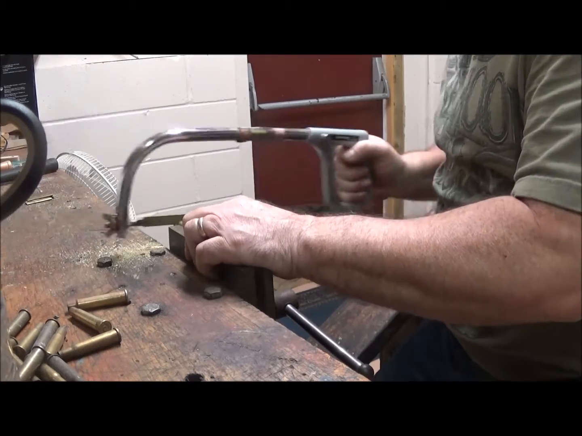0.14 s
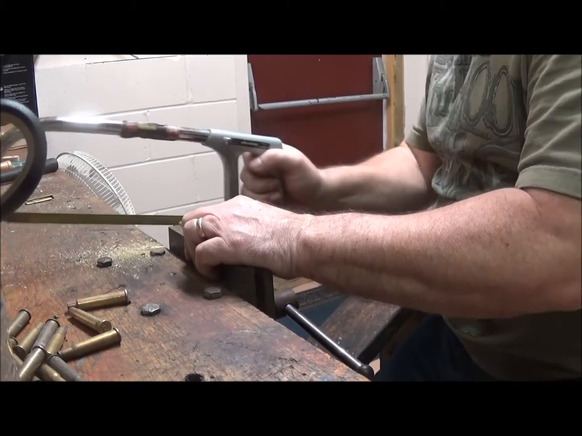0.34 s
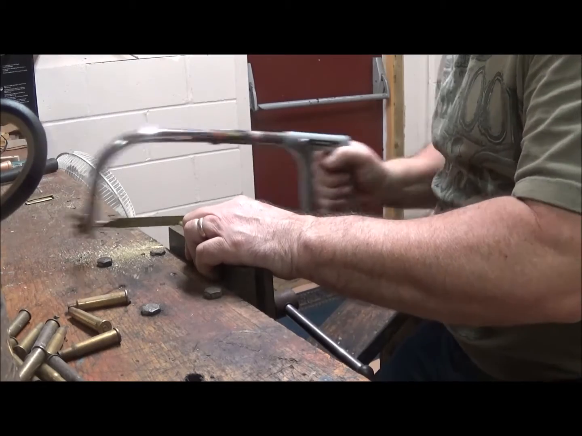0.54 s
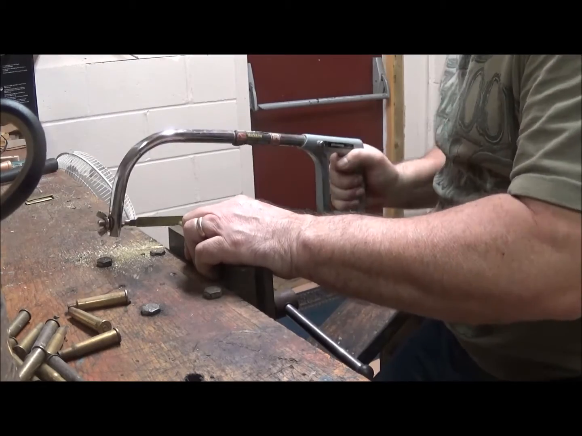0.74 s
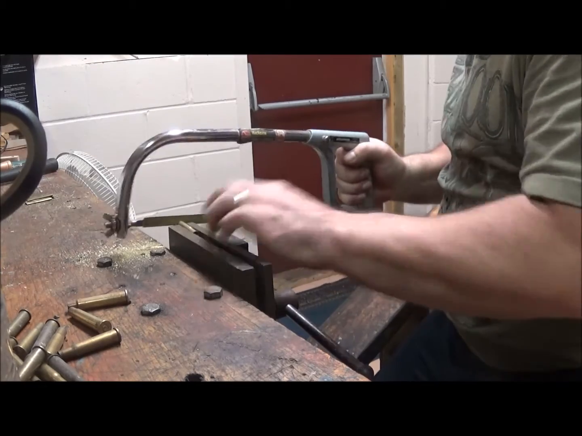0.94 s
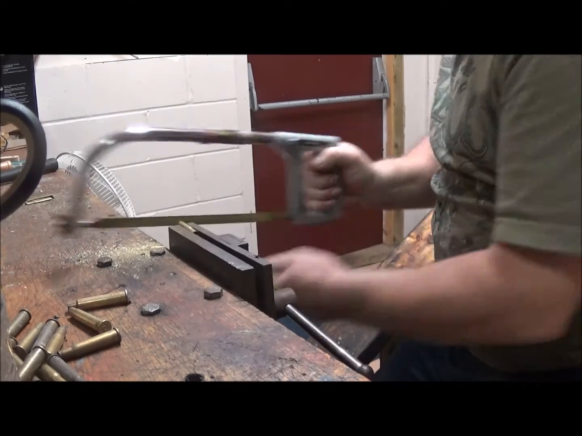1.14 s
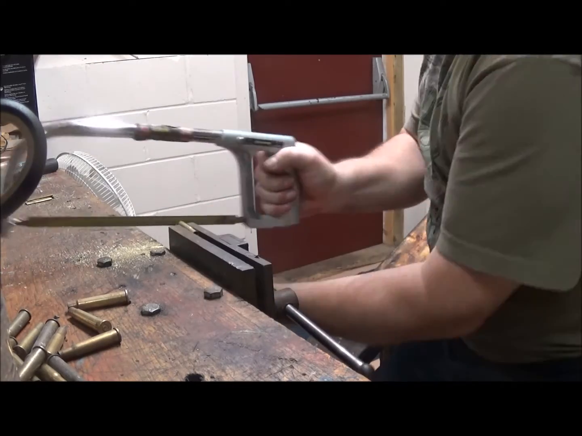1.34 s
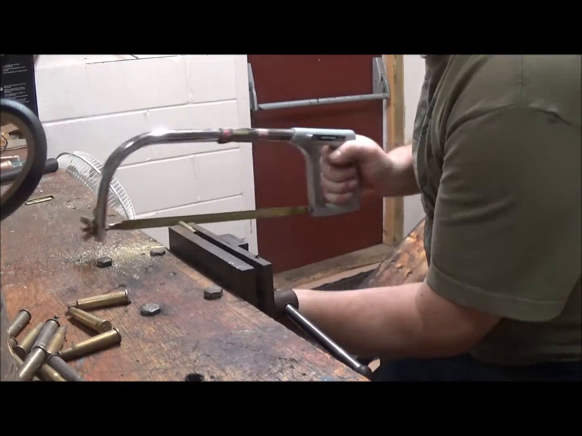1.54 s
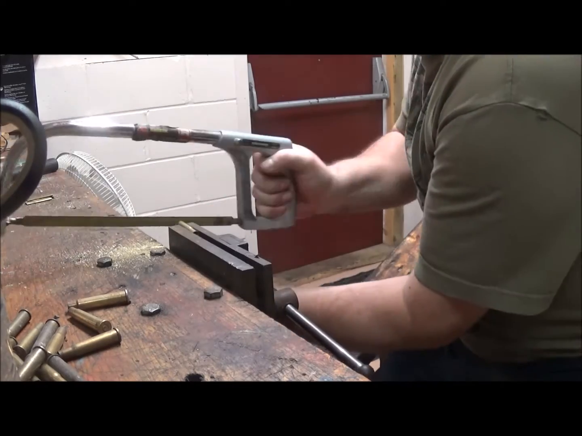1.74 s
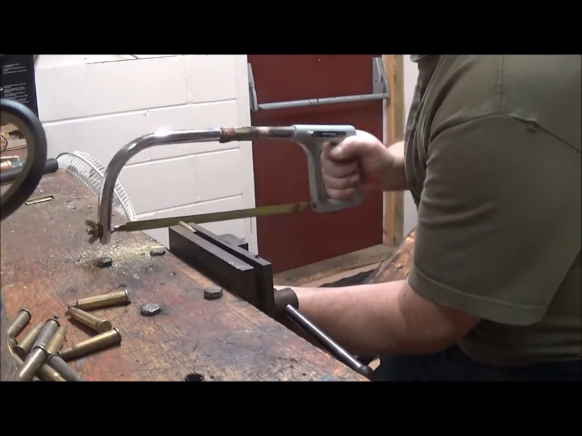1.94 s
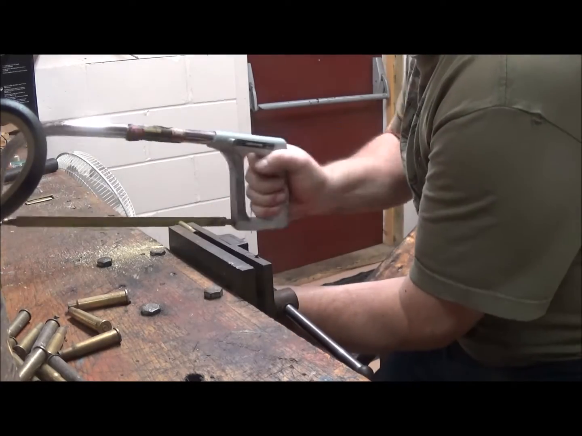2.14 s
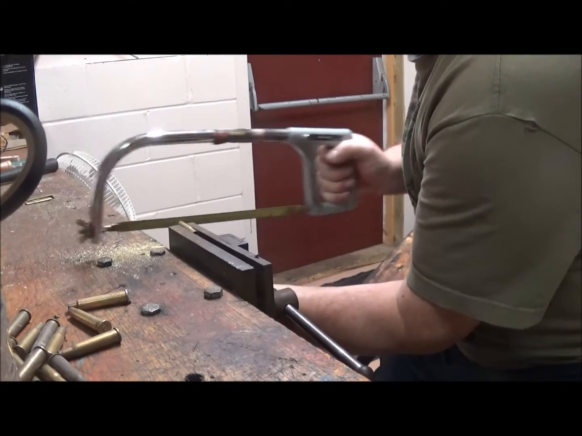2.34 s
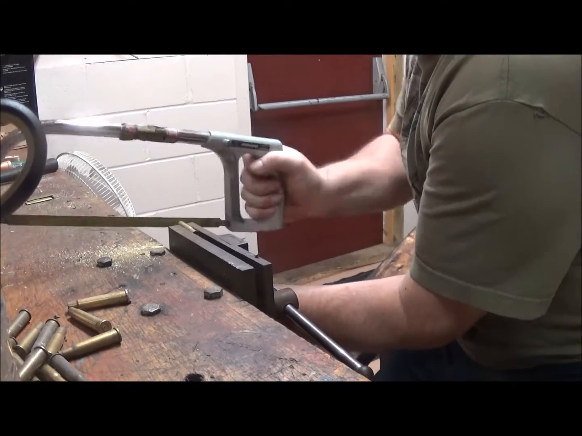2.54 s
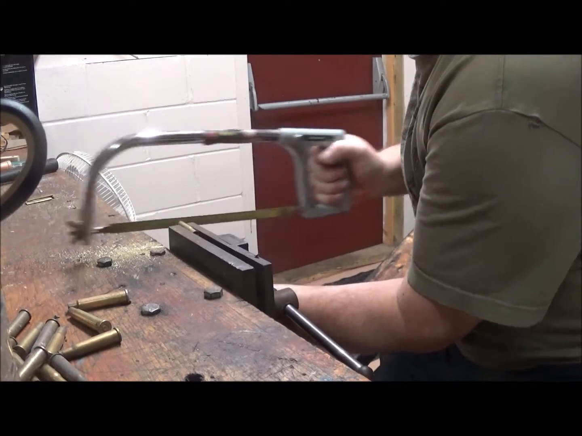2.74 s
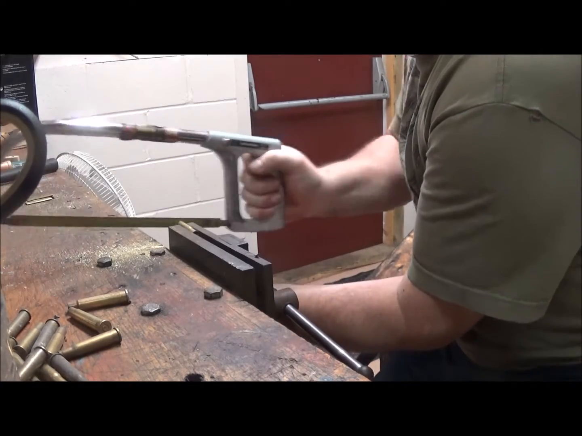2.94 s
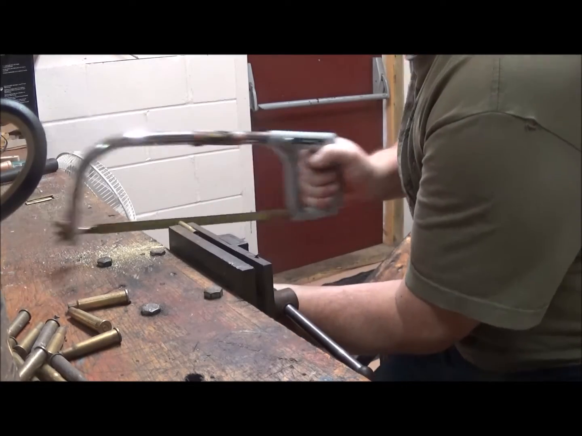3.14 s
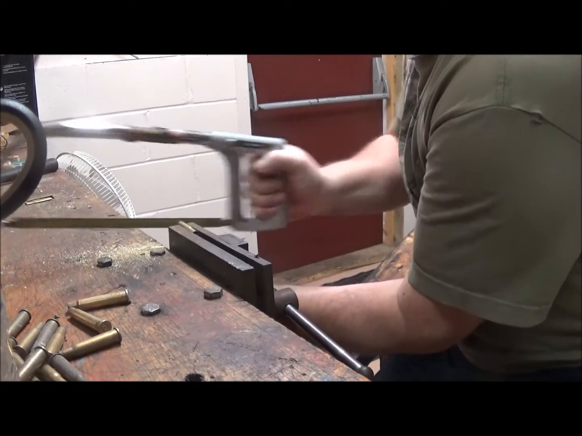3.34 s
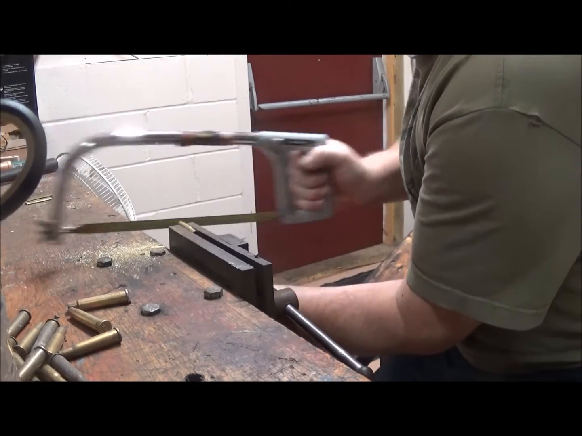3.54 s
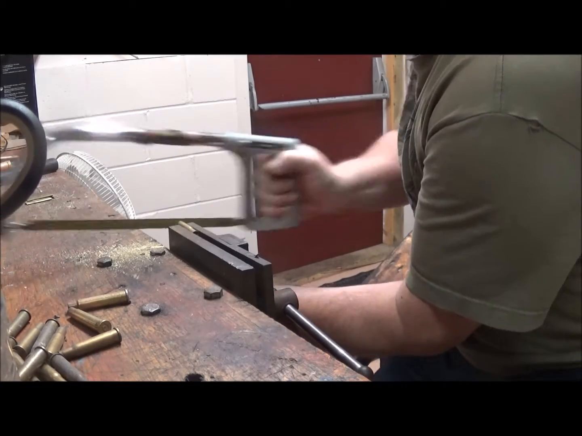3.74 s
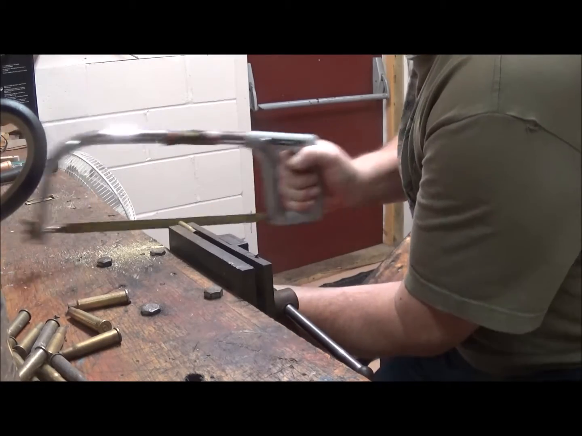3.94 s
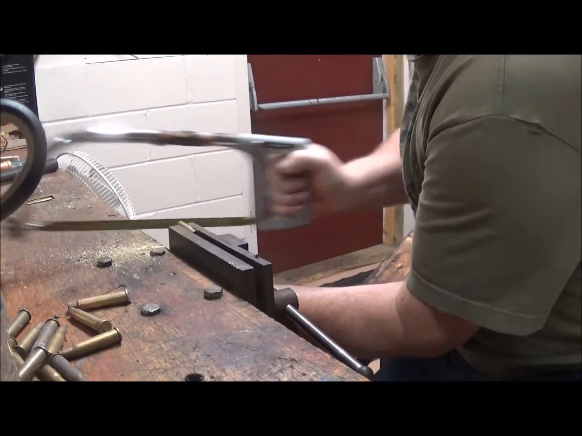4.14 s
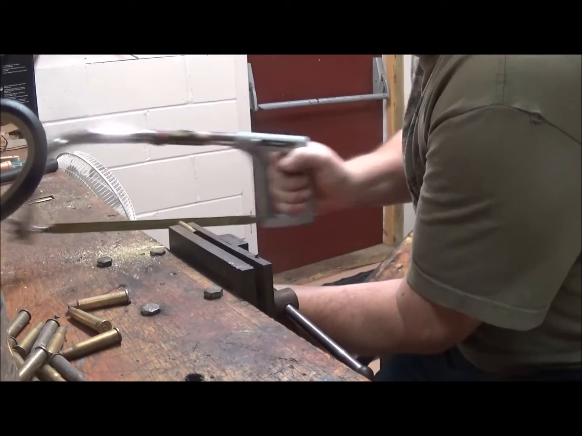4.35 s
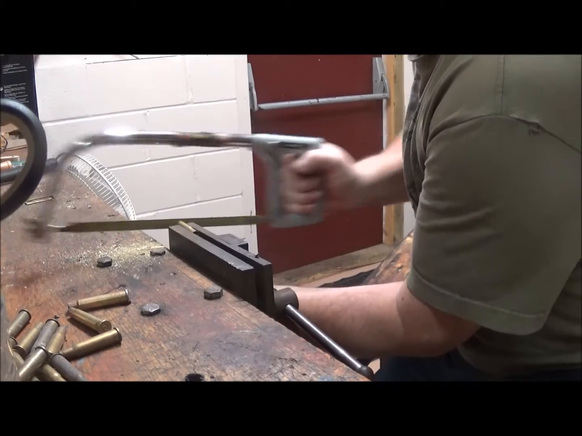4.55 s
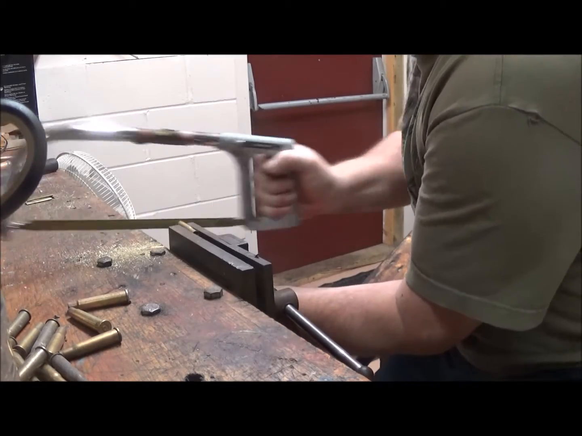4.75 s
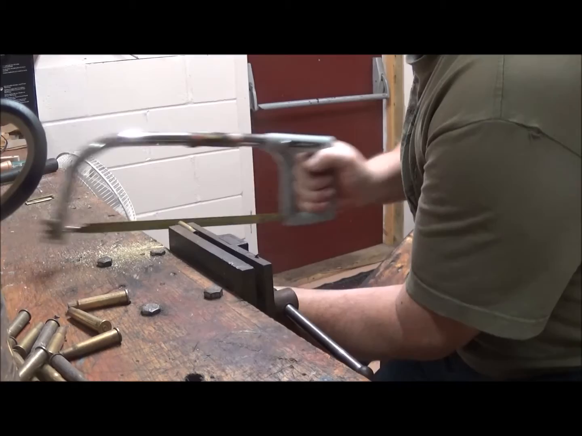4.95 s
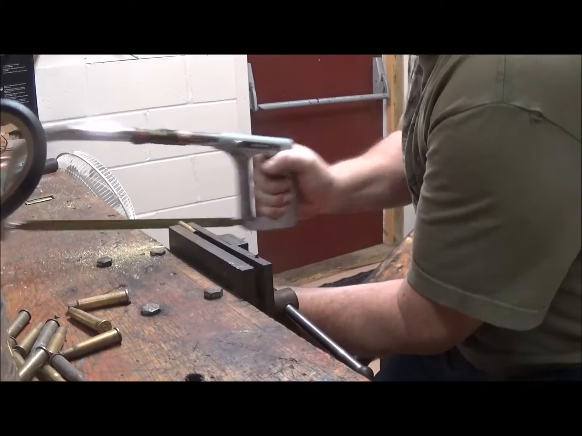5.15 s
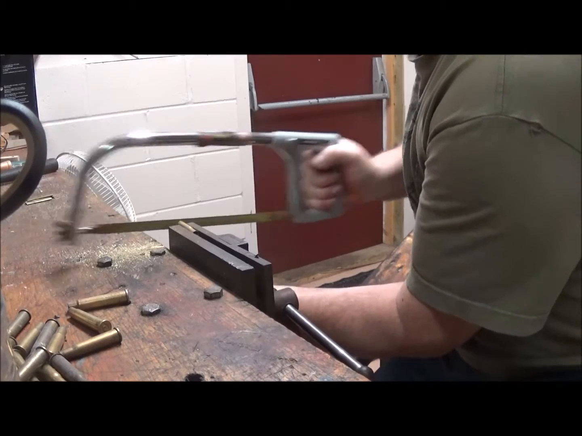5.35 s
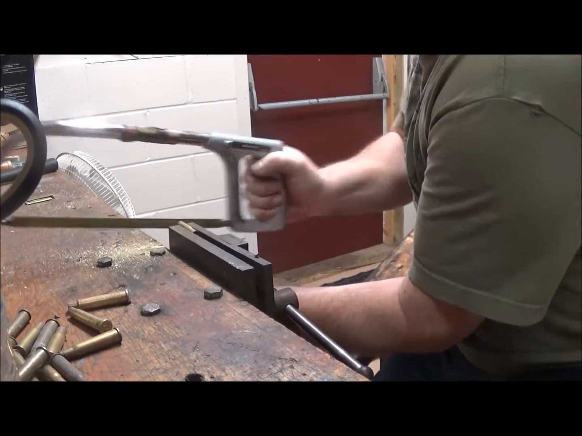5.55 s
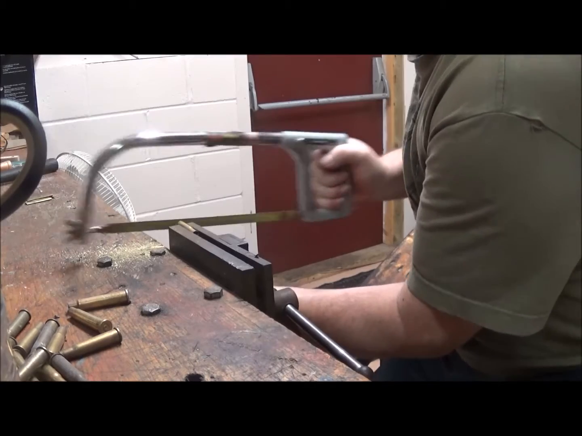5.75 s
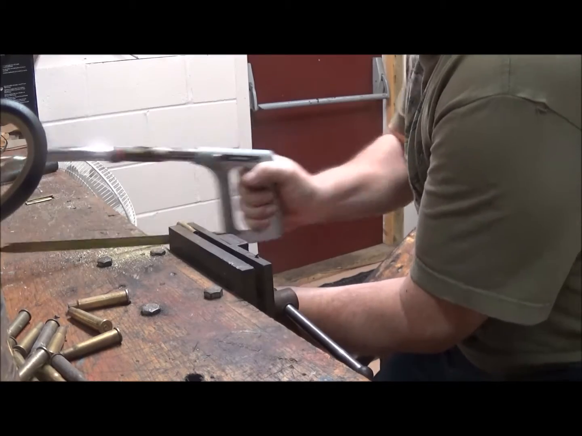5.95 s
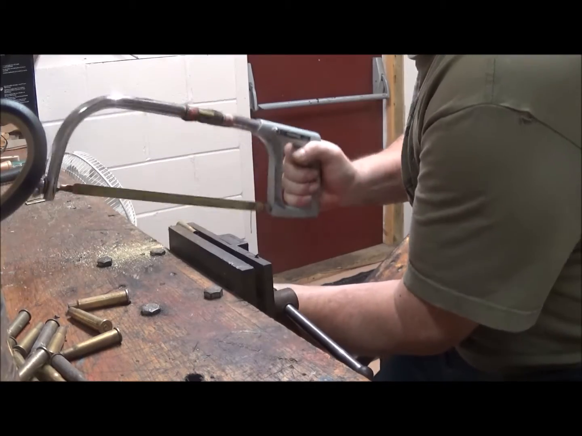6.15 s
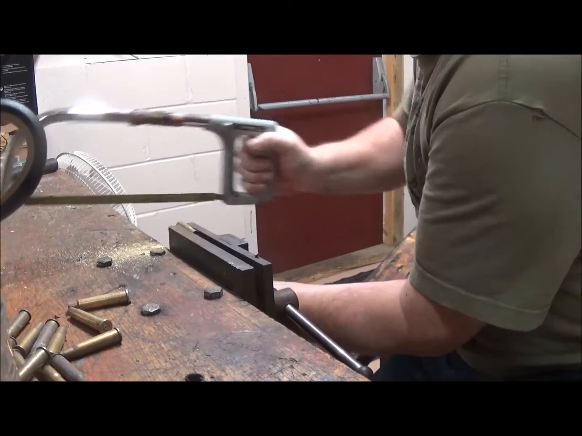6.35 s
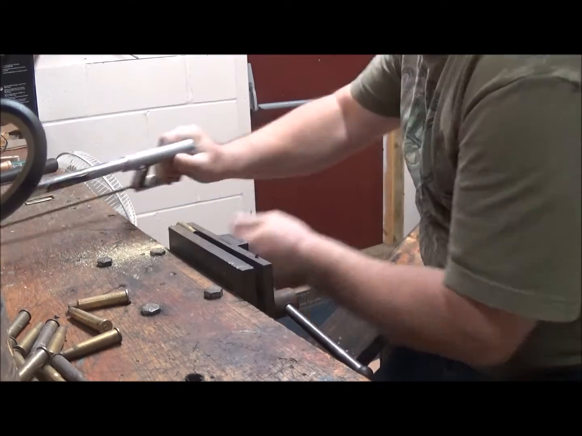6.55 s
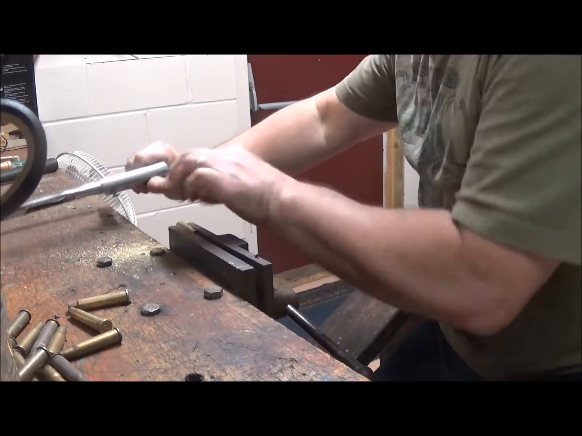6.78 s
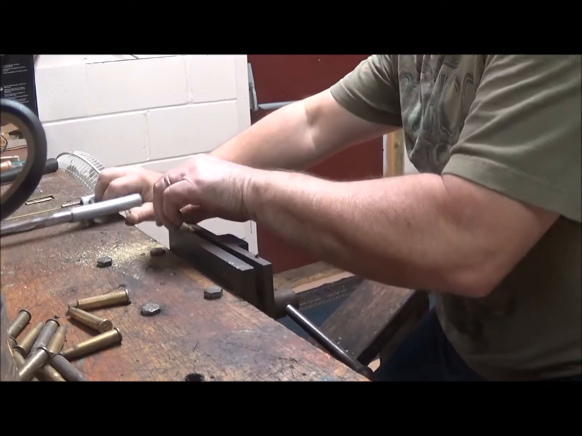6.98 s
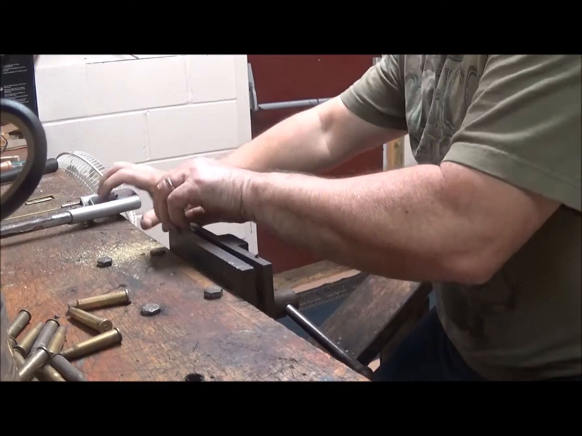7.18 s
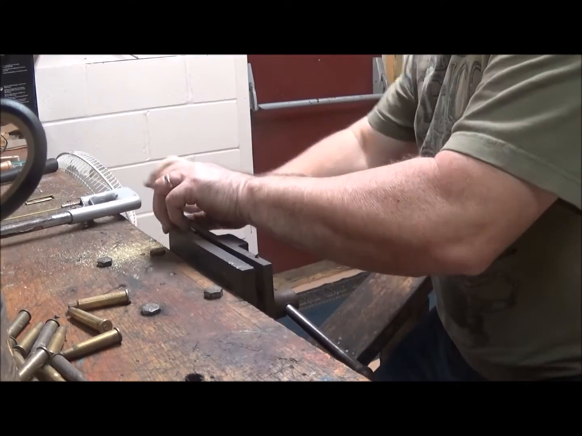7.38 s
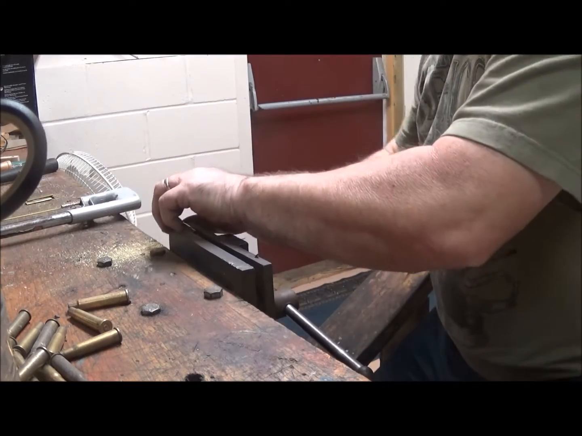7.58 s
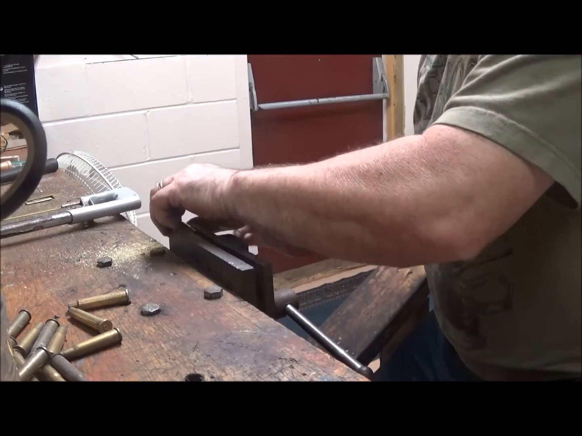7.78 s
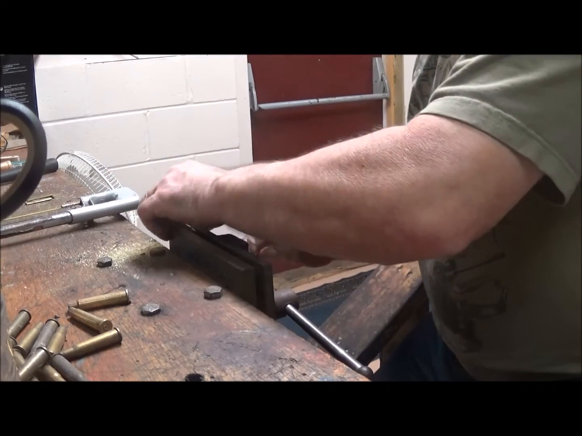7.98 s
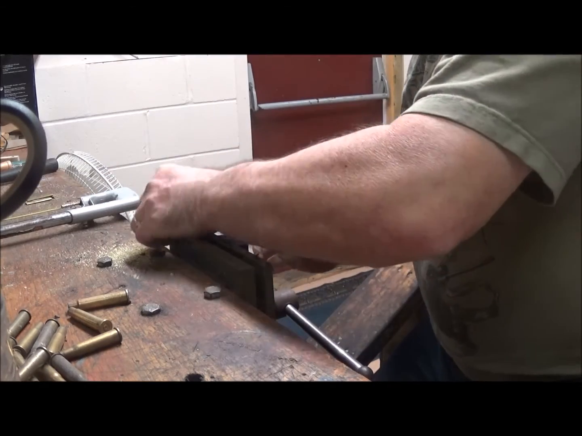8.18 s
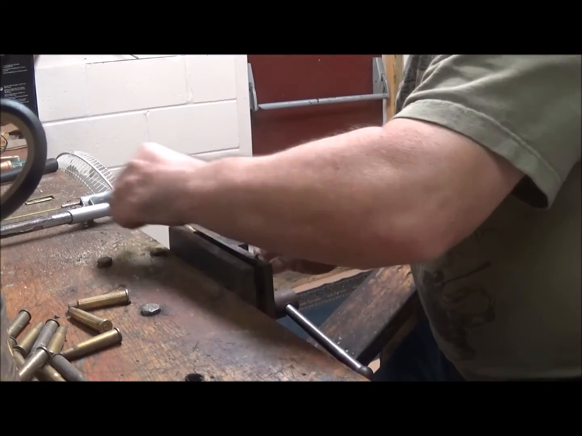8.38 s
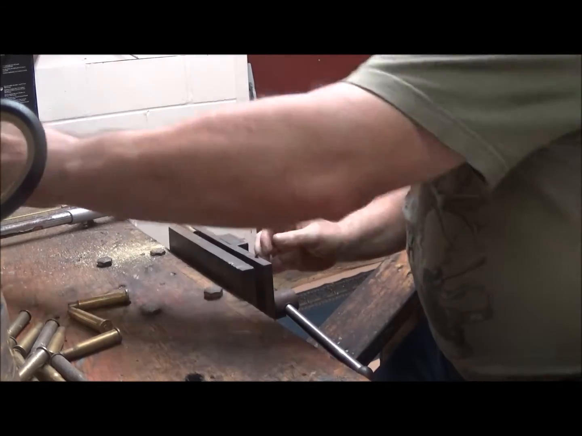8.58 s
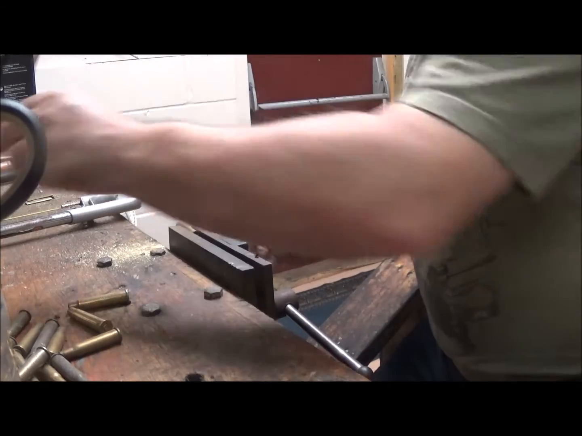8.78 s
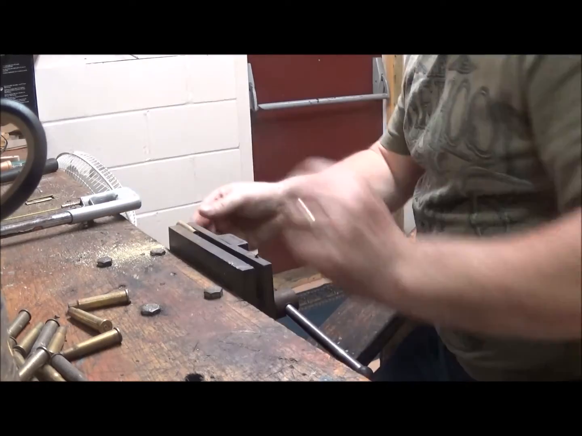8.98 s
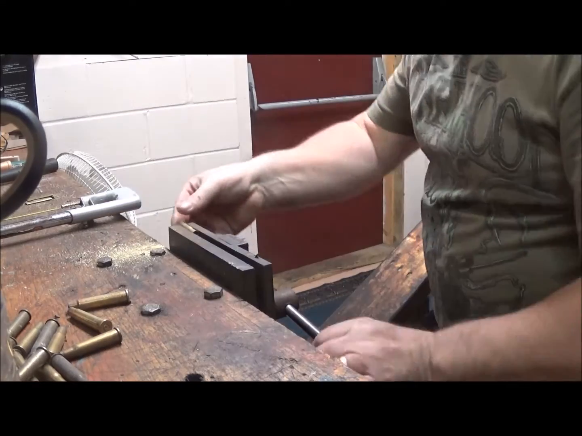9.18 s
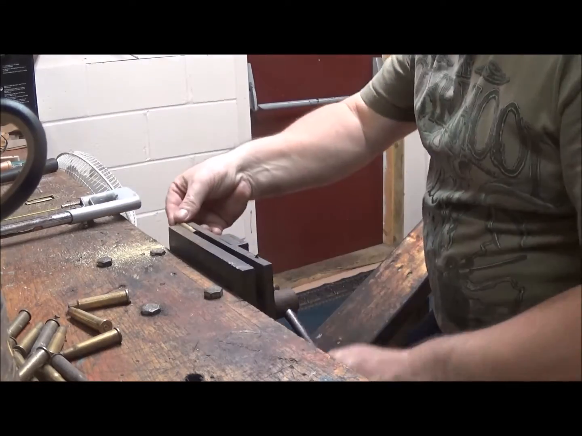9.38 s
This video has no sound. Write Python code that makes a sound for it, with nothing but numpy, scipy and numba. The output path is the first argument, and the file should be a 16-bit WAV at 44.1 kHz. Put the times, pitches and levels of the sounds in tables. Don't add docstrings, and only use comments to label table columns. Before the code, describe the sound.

Loud, gritty back-and-forth sawing of brass fills the first six seconds, with a honking vise resonance and sizzling metallic hiss. Then the saw is laid on the bench, rattling and thudding, and slid aside. Quiet handling follows over soft room hum, ending with a tinkling metal drop, low handle knocks and a sharp click. Close stereo pickup, short hard-walled room.

```python
import sys
import numpy as np
from scipy import signal
from scipy.fft import rfft, irfft
from scipy.io import wavfile
from scipy.ndimage import uniform_filter1d
from numba import njit

SR = 44100
rng = np.random.default_rng(int(sys.argv[2]) if len(sys.argv) > 2 else 0)


def inscribe(sig):
    pcm = np.round(np.clip(np.atleast_2d(sig).T, -1, 1) * 32767)
    wavfile.write(sys.argv[1], SR, pcm.astype(np.int16))


def voltage_ratio(decibels):
    exponent = np.asarray(decibels, float) / 20
    return 10 ** exponent


N = 415418
t = np.arange(N) / SR

# frequency in Hz, level in dB per Hz.
AIR = [(15, -59.5), (25, -28), (110, -1.5), (253, -9.5), (306, -15), (360, -12), (2860, -20), (3190, -16.5),
       (4170, -23), (9880, -25), (15600, -34.5)]
# frequency in Hz, level in dB.
AIR_SIDE = [(100, -20.0), (400, -5.5), (1400, -2.0), (4000, -3.0), (9000, -15), (15000, -25.5)]
# frequency in Hz, level in dB.
HUM = [(118.4, -64), (306.8, -61.5), (635.2, -70), (850.6, -72.5), (1739, -74.5)]
# time in seconds, background level in dB.
BACKGROUND = [
    (0, -52.5),
    (6.2, -58),
    (6.45, -60),
    (7.2, -55),
    (7.6, -54.5),
    (8.4, -52),
    (8.72, -49.5),
    (8.8, -51.5),
    (9.42, -44),
]

# start, fastest and stop in seconds, top tooth rate in Hz.
PUSHES = [(.2, .29, .4, 900), (1.09, 1.19, 1.31, 870), (1.58, 1.615, 1.745, 880), (2.0, 2.03, 2.18, 850),
          (2.41, 2.45, 2.61, 900), (2.83, 2.855, 3.01, 900), (3.255, 3.3, 3.45, 950),
          (3.67, 3.705, 3.845, 990), (4.09, 4.125, 4.26, 1050), (4.51, 4.54, 4.69, 1000),
          (4.93, 4.965, 5.1, 1080), (5.35, 5.375, 5.515, 1010), (5.76, 5.79, 5.93, 950)]
BITE_DB = [-23, -26, -22.5, -23, -24, -22.5, -35.5, -22, -23.5, -23.5, -22, -20.5, -30]
# share of the way to the stop, tooth rate in Hz.
SLOWING = [(.25, 870), (.5, 810), (.62, 690), (.75, 590), (1, 360)]
# turn and loudest in seconds, chip rasp and vise chatter in dB.
TRAVELS = [(-.02, 0.121, -15.5, -16.5), (0.17, 0.29, -14, -13), (0.429, 0.511, -12, -13.5),
           (0.882, 1.03, -39.5, -35.5), (1.074, 1.143, -13, -10), (1.357, 1.481, -13, -14),
           (1.568, 1.628, -11, -10), (1.759, 1.896, -12, -14), (1.981, 2.056, -11.5, -8.5),
           (2.185, 2.315, -13, -13.5), (2.397, 2.457, -12.5, -4.5), (2.6, 2.76, -14.5, -14.5),
           (2.823, 2.854, -12.5, -8.5), (3.038, 3.17, -13.5, -11), (3.239, 3.295, -13.5, -10.5),
           (3.441, 3.589, -15, -10.5), (3.666, 3.706, -13, -10.5), (3.872, 3.985, -17.5, -16.5),
           (4.081, 4.13, -12.5, -4.5), (4.268, 4.439, -15.5, -13.5), (4.494, 4.555, -13.5, -7),
           (4.707, 4.826, -14.5, -11), (4.921, 4.953, -13, -9), (5.13, 5.25, -13.5, -11.5),
           (5.328, 5.38, -14.5, -10), (5.547, 5.665, -17, -12), (5.751, 5.795, -12.5, -8.5),
           (5.964, 6.026, -31, -31)]
# time in seconds, peak in dB.
GRABS = [(0.211, 0), (0.448, -0.5), (0.477, 1.5), (0.598, -4), (0.644, -3), (0.93, -38), (1.078, 3.5),
         (1.396, -17), (1.586, -2.5), (1.825, -2), (2.001, -2), (2.223, -4.5), (2.414, 1), (2.832, -1.5),
         (3.258, 1), (3.483, -11.5), (3.992, -1.5), (4.097, -2), (4.368, 1), (4.938, -7.5), (5.196, -2),
         (5.622, -2), (5.909, 1)]
# frequency in Hz, level in dB, 60 dB decay in seconds.
GRAB_MODES = [(809.4, 0.0, 0.068), (909, -19.0, 0.016), (1700, -18.5, 0.053), (2200, -9.5, 0.023)]
# landing in seconds, swell in dB.
BOUNCES = [(0.451, 10), (0.475, 9.5), (0.497, 6), (0.541, 4.0), (0.599, 4.5), (0.645, 9.5), (1.419, 10.5),
           (1.441, 8.5), (1.465, 7), (1.489, 4), (1.511, 10.5), (1.802, 9.5), (1.829, 8), (1.855, 10),
           (1.898, 5.5), (1.93, 5), (2.224, 5), (2.255, 3.5), (2.27, 7.0), (2.34, 4.5), (2.359, 10),
           (2.635, 8.5), (2.664, 7.5), (2.692, 6.5), (2.713, 5.0), (2.767, 9.5), (2.786, 4.5), (3.101, 7),
           (3.115, 8.0), (3.138, 11), (3.159, 4), (3.177, 5), (3.2, 8), (3.486, 9.5), (3.511, 4.5),
           (3.536, 4.5), (3.587, 6.5), (3.627, 9), (3.959, 8.0), (3.995, 8), (4.328, 12), (4.377, 10.5),
           (4.399, 6.5), (4.421, 10.5), (4.461, 7.0), (4.734, 9.0), (4.762, 9.0), (4.782, 5.0), (4.832, 4),
           (4.861, 9), (5.198, 8), (5.221, 6), (5.241, 6), (5.281, 9.5), (5.594, 10), (5.624, 10.5),
           (5.65, 9.5), (5.673, 10), (5.694, 9.5), (5.716, 9.5)]
# time in seconds, peak in dB.
SKIPS = [(1.4163, -8), (1.4387, -5), (1.4611, -5.5), (1.4851, -4.5), (1.5255, -8), (1.5846, -4),
         (1.7699, -17), (1.7984, -11), (1.8259, -7.5), (1.8525, -6.5), (1.8733, -2), (1.8962, -5.5),
         (1.9993, -10), (2.0107, -6.5), (2.2134, -7), (2.2749, -5), (2.3373, -4.5), (2.411, -13)]
# frequency in Hz, width in Hz, level in dB.
VISE = [(409, 30, -3.5), (484.6, 8.9, 1.5), (600, 36, 0.5), (727.6, 22, 2), (822, 16, 6.5),
        (889.7, 56, 8.5), (890, 210, -7.5), (1110, 100, -12.5)]
FRAME = [(1745, 68, 2.1), (2110, 29, 1), (2517, 370, 2.4)]
TUBE = [(4450, 45, 5.5), (4765, 30, 13.5), (5750, 82, 7), (6490, 270, 3.5), (7290, 190, -7.5),
        (8340, 140, 9), (9100, 540, 2), (10050, 470, 3.5), (11800, 550, -1)]
BENCH = [(110, 29.7, 0), (135, 53.7, -4), (206, 32, -9.5), (264, 82, -17), (437, 46, -14.5)]
# frequency in Hz, level in dB per Hz.
CHIPS = [(710, -27), (1200, 1), (1730, 2.5), (1950, -1), (2540, 4.5), (5170, -7), (9950, -6),
         (15600, -26.5)]
# time in seconds, ring in Hz, dB re rasp.
OFFCUT = [(0, 2660, -9.5), (1.4, 2720, -6), (1.47, 2760, -2), (1.485, 3320, 2), (1.545, 3230, -1),
          (1.59, 2850, -3), (1.95, 2940, -4), (2.1, 2830, -2), (2.17, 2740, -9), (2.3, 2570, -0.5),
          (2.5, 2650, -4), (2.75, 2260, -8.5), (2.9, 1790, -12), (3.6, 1700, -5.5), (4.4, 1260, -12.5),
          (6.3, 1226, -27)]
# time in seconds, level in dB.
LOAD = [
    (0, -23.5),
    (.7, -23),
    (.86, -46.5),
    (.95, -26.5),
    (1.1, -14),
    (1.2, -27),
    (5.8, -25),
    (6.06, -28),
    (6.2, -51.5),
]
# frequency in Hz, level in dB.
BASS_CUT = [(25, -6.5), (55, -8), (80, -10), (100, -2)]

# time in seconds, peak in dB, ring in Hz, 60 dB decay in seconds.
CLICKS = [(6.377, -53, 9430, 0.01), (7.276, -34, 2250, 0.028), (7.313, -40, 890, 0.097),
          (7.886, -46, 3150, 0.059), (8.185, -38, 885, 0.062), (8.221, -37, 2010, 0.035),
          (8.323, -42, 910, 0.043), (8.649, -41.5, 2170, 0.05), (9.135, -32.5, 494, 0.042),
          (9.147, -27.5, 580, 0.031), (9.213, -27, 610, 0.02), (9.236, -27, 506, 0.053),
          (9.278, -27, 805, 0.044), (9.349, -27, 630, 0.026), (9.417, -13, 4520, 0.022)]
# time in seconds, peak in dB.
TICKS = [
    (7.133, -38.5),
    (7.6208, -52.5),
    (7.8322, -52.5),
    (7.888, -37),
    (7.9795, -42.5),
    (8.188, -35),
    (8.327, -50),
]
# frequency in Hz, level in dB, 60 dB decay in seconds.
NAIL_MODES = [(7900, 0, .003), (10000, 2, .003), (12300, -2, .003)]

# time in seconds, peak in dB, metal ring and wood thud in dB re peak.
KNOCKS = [(6.473, 4, -17, -7), (6.48, -6, -11.5, -5.5), (6.486, -8.5, -17.5, -3), (6.511, -12, -12.5, -6.5),
          (6.53, -7.5, -11.5, 2), (6.563, -2, -29.5, -2), (6.61, -5.5, -17.5, -3), (6.654, -25, -12, -6.5),
          (6.712, -23, -28.5, -4), (6.768, -27, -23.5, 2.5), (6.81, -11.5, -12, -1), (6.854, -22, -40, 3.5),
          (7.024, -7, -34, -9)]
# frequency in Hz, level in dB, 60 dB decay in seconds.
SAW_MODES = [(1141, -2, 0.1), (1340, -9.5, 0.072), (1860, -14, 0.059), (2266, -3.5, .05), (2533, -2.5, .13),
             (3220, -2, 0.1), (3320, 5, 0.082), (3370, -6, .3), (3710, -10, .15), (4300, -10, 0.045)]
BLADE_MODES = [(4800, -10.5, .15), (5830, -7.5, 0.11), (6340, -9, 0.17), (7140, -15.5, 0.14),
               (7970, -8, 0.14), (8500, -10, 0.087), (8877, -10.5, 0.088), (10170, -4, 0.13),
               (11000, -14, 0.22), (12000, -14, .1)]
WOOD_MODES = [(167, -26.5, 0.1), (230, -2.5, 0.14), (403, -4.5, 0.14), (565, -1, 0.025), (657, 6, 0.036),
              (741, 0, 0.043), (808, -9, 0.043), (1780, 5, 0.021)]
# frequency in Hz, level in dB.
RATTLE = [(300, -10), (1500, -1.0), (3500, -2.5), (9000, -4.5), (13000, -17.5), (16000, -40.0)]
# loudest and faded in seconds, low rumble in dB,
# board scrape and grit in dB re rumble.
HANDLING = [
    (6.517, 6.785, -21, 2, -1),
    (6.837, 6.988, -24.5, 4.5, -1),
    (6.936, 7.1, -39.5, 16.5, 9.5),
    (7.02, 7.14, -19, 0, -33),
    (7.15, 7.454, -45, -23, -23),
    (8.185, 8.298, -37, -27, -5),
    (8.784, 9.078, -34.5, -6.5, -10.5),
    (9.146, 9.496, -28.5, -8, -9),
    (9.303, 9.7, -34, -15, -34),
]

# time in seconds, peak in dB.
DROPS = [
    (8.754, -12),
    (8.757, -12),
    (8.763, -12.5),
    (8.769, -13.5),
    (8.774, -15.5),
    (8.783, -24),
    (8.8, -21),
    (8.84, -28),
]
# time in seconds, peak in dB.
REBOUNDS = [
    (8.893, -26.5),
    (8.995, -36),
    (9.328, -36),
]
# frequency in Hz, level in dB, 60 dB decay in seconds.
BRASS_MODES = [(4720, -12, .06), (4870, -7, .07), (4963, -1.5, 0.12), (5027, -5.5, .25), (7470, -21, .12),
               (8016, -6.5, .2), (8080, -3.5, .21), (8060, -13.5, .15), (10070, -18, .2),
               (11600, -10.5, .19), (14300, -14, .12), (14950, -19, .2)]
TIPPED_MODES = [(5080, 4, .05), (8120, -8, .07)]
THUD_MODES = [(167, -5.0, 0.2), (230, -4.0, 0.3), (336, -9, 0.1), (506, 2.5, 0.044)]
# frequency in Hz, level in dB.
FIZZ = [(1000, -30.0), (3000, -9.0), (4900, 8.5), (6200, -5.0), (8200, -2.5), (15000, -5.0)]

# frequency in Hz, side minus mid in dB.
WIDTH = [(60, -33.5), (110, -27), (200, -23), (380, -10.5), (700, -17), (1290, -6), (2380, -12),
         (4400, -15.5), (8120, -13), (11000, -24.5), (15000, -36)]
# frequency in Hz, level in dB.
TAIL = [(100, -26.5), (330, -9.5), (1000, -4.5), (5000, -11.5), (15000, -19.0)]

ROOM_T60_S = 0.26
LONGEST_FALL_S, LAST_STOP_S = .17, 6.1
RASP_TURN_DB, RASP_RISE, RASP_FALL = -24.5, 3.19, 1.79
VISE_TURN_DB, VISE_RISE, VISE_FALL = -18.5, 4.2, 4.5
GLIDE_DB = -7.5
TUBE_FREE_DB, TUBE_HELD_DB, TUBE_HELD_S = -9, -13, 1.3
STALL_S, STALL_DB = 0.059, -3.5
JUDDER_BELOW_HZ = 835
TOP_SWELL = 0.2
BOUNCE_S, BOUNCE_DEPTH, BOUNCE_DIP = 0.0047, 0.74, 0.44
SLIDE_RISE_S, SLIDE_FADE_DB = 0.035, -21.5
BLADE_LATE_DB = -10.5


def unit(x):
    return x / np.sqrt(np.mean(x ** 2))


def curves(table):
    s, first, *rest = np.transpose(table)
    return [np.interp(t, s, first, -120, -120)] + [np.interp(t, s, c) for c in rest]


def colour(x, points):
    hz, db = np.transpose(points)
    f = np.fft.rfftfreq(x.shape[-1], 1 / SR) + 1
    return irfft(rfft(x) * voltage_ratio(np.interp(np.log(f), np.log(hz), db)), x.shape[-1])


def highpass(x, order, hz):
    return signal.sosfilt(signal.butter(order, hz, "high", fs=SR, output="sos"), x)


def resonate(x, peaks):
    out = 0
    for k, (hz, width, db) in enumerate(peaks):
        out = out + (-1) ** k * voltage_ratio(db) * signal.lfilter(*signal.iirpeak(hz, hz / width, SR), x)
    return out


def ring(x, modes):
    out = 0
    for hz, db, t60 in modes:
        pole = np.exp((2j * np.pi * hz - np.log(1000) / t60) / SR)
        out = out + voltage_ratio(db) * signal.lfilter([1], [1, -pole], x).imag
    return out


@njit
def glide(x, hz, width):
    y, b, l = np.empty(len(x)), 0., 0.
    for i in range(len(x)):
        g, k = np.tan(np.pi * hz[i] / SR), width / hz[i]
        v = (b + g * (x[i] - l)) / (1 + g * (g + k))
        b, l, y[i] = 2 * v - b, l + 2 * g * v, k * v
    return y


def patchy(x, peaks, spread_db):
    return sum(resonate(x, [peak]) * voltage_ratio(spread_db * walk(11)) for peak in peaks)


def grains(rate, spread_db):
    struck = rng.random(N) < rate / SR
    size = voltage_ratio(spread_db * rng.exponential(size=N).clip(0, 3))
    return unit(struck * rng.standard_normal(N) * size)


def thumps(rate, spread_db):
    return np.convolve(grains(rate, spread_db), np.hanning(60))[:N]


def walk(rate):
    k = int(SR / rate)
    return unit(uniform_filter1d(uniform_filter1d(rng.standard_normal(N), k), k))


def blows(times, db, contact_s):
    x = np.zeros(N)
    x[(np.asarray(times) * SR).astype(int)] = voltage_ratio(np.asarray(db))
    push = np.hanning(int(contact_s * SR) + 3)
    return np.convolve(x, push / push.sum())[:N]


def swell(start, top, stop, end_db, rise, fall):
    before = ((top - t) / (top - start)).clip(0, 3) ** rise
    after = ((t - top) / (stop - top)).clip(0, 5) ** fall
    return voltage_ratio(end_db * np.where(t < top, before, after))


def pan(x, db):
    return x * voltage_ratio(np.array([[db], [-db]]) / 2)


def background():
    mid, side = unit(colour(rng.standard_normal((2, N)), AIR))
    side = colour(side, AIR_SIDE)
    hum = sum(np.sqrt(2) * voltage_ratio(db + 55.5 + .8 * walk(3)) * np.sin(2 * np.pi * hz * t) for hz, db in HUM)
    times = np.arange(.022, N / SR, 1 / 29.97)
    tick_db = -3.0 * (-1) ** np.arange(len(times)) + 2.0 * rng.standard_normal(len(times))
    ticks = resonate(resonate(blows(times, tick_db, .0001), [(3210, 70, 0)]), [(3150, 300, 0)])
    mid = mid * voltage_ratio(0.69 * walk(4)) + hum + voltage_ratio(-15) * unit(ticks)
    return np.array([mid + side, mid - side]) * voltage_ratio(np.interp(t, *np.transpose(BACKGROUND)))


def travels():
    turn, top, rasp_db, vise_db = np.transpose(TRAVELS)
    stop = np.minimum(np.append(turn[1:], LAST_STOP_S), top + LONGEST_FALL_S)
    rasp, vise = np.zeros(N), np.zeros(N)
    for a, b, c, r_db, v_db in zip(turn, top, stop, rasp_db, vise_db):
        rasp = rasp + voltage_ratio(r_db) * swell(a, b, c, RASP_TURN_DB, RASP_RISE, RASP_FALL)
        vise = vise + voltage_ratio(v_db) * swell(a, b, c, VISE_TURN_DB, VISE_RISE, VISE_FALL)
    fast = np.interp(t, np.ravel([turn, top], order="F"), np.arange(2 * len(turn)) % 2)
    return rasp, vise, fast


def teeth():
    hz, bite = np.zeros(N), np.zeros(N)
    for (start, fastest, stop, top_hz), db in zip(PUSHES, BITE_DB):
        early = start < 1.5
        angle = np.interp(t, [start, fastest, stop], [.12 if early else .4, np.pi / 2, np.pi], 0)
        speed = np.sin(angle).clip(0)
        lean = .9 if early else .25
        free_hz = top_hz * speed ** (.9 if early else .62)
        share, slowing_hz = np.transpose([(0.00042, top_hz)] + SLOWING)
        slowing_hz = np.interp(t, fastest + share * (stop - fastest), np.minimum(slowing_hz, top_hz), 0, 0)
        hz = hz + np.where((t > fastest) & (start > 1.5), slowing_hz, free_hz)
        bite = bite + voltage_ratio(db) * np.clip(6 * speed - .4, 0, 1) * np.interp(t, [start, stop], [lean, 1.3])
    wobble = .025 + np.where(t < 1.5, .25, .3) * np.clip(1 - hz / JUDDER_BELOW_HZ, 0, 1)
    phase = np.cumsum(hz * (1 + wobble * walk(180))) / SR
    pulses = np.diff(np.floor(phase), prepend=0) * voltage_ratio(2.2 * rng.standard_normal(N))
    pulses = np.convolve(pulses, np.hanning(26) / 13)[:N]
    return pulses * bite * np.sqrt(SR / np.maximum(hz, 100)), phase % 1, bite * (hz / 900) ** 2


def bounces():
    s, db = np.transpose(BOUNCES)
    x = np.zeros(N)
    x[(s * SR).astype(int)] = db
    lag = np.arange(-2000, 2001) / SR / BOUNCE_S
    landing = np.exp(-lag ** 2 / 2) - BOUNCE_DIP * np.exp(-lag ** 2 / 18)
    return BOUNCE_DEPTH * np.convolve(x, landing, "same")


def vise_ring(pulses, chatter, gain):
    bite = resonate(pulses, VISE) * voltage_ratio(26)
    bite = bite + resonate(pulses, [(600, 900, 0)]) * voltage_ratio(22)
    bite = bite + resonate(pulses, FRAME) * voltage_ratio(16)
    bite = bite + resonate(resonate(pulses, [(1570, 1700, 0)]), [(1590, 2800, 0)]) * voltage_ratio(11.5)
    rattle = unit(resonate(patchy(chatter, VISE, 3.1), [(840, 850, 0)])) * gain
    grab = blows(*np.transpose(GRABS), 0.00011)
    return bite + rattle + voltage_ratio(-5.0) * ring(grab, GRAB_MODES)


def saw_frame(chips, chatter, rasp_db):
    broad = unit(resonate(resonate(chips, [(2070, 1100, 0)]), [(2100, 1300, 0)]))
    frame = unit(patchy(chips + 0.33 * chatter, FRAME, 3.6)) + voltage_ratio(2.0) * broad * voltage_ratio(1.1 * walk(48))
    return frame * voltage_ratio(0.85 * rasp_db - 8.0)


def loosening_offcut(rasp_db):
    hz, db = curves(OFFCUT)
    hz = hz * (1 + .012 * walk(25))
    tube_db = np.interp(t, [TUBE_HELD_S - .2, TUBE_HELD_S + 0.13], [TUBE_FREE_DB, TUBE_HELD_DB])
    shake = grains(1900, 5.7)
    offcut = unit(glide(glide(shake, hz, 280.), hz, 280.)) * voltage_ratio(rasp_db + db + 3.3 * walk(45))
    whole_tube = unit(patchy(shake, [(3725, 97, 0)], 2.2)) * voltage_ratio(rasp_db + tube_db)
    skips = blows(*np.transpose(SKIPS), .00005) * voltage_ratio(23.5)
    return offcut + whole_tube + glide(skips, hz, 130.) + glide(skips, 0.84 * hz, 160.)


def chip_rasp(chips, rasp_db):
    high = highpass(chips, 3, 3100)
    tube = unit(patchy(high, TUBE, 4.0))
    finest = colour(high, [(8500, -27.5), (12000, 0)])
    high = high - finest + finest * voltage_ratio(TOP_SWELL * (rasp_db + 18))
    return (unit(high) + voltage_ratio(-5.5) * tube) * voltage_ratio(rasp_db - 3)


def saw():
    rasp_gain, vise_gain, fast = travels()
    sticking = sum(np.interp(t, [s - STALL_S, s - .003, s], [0, 1, 0]) for s, _ in GRABS)
    stall = voltage_ratio(STALL_DB * sticking)
    rasp_db = 20 * np.log10(rasp_gain * stall + 1e-6)
    pulses, phase, smooth = teeth()
    calm = 1 / (1 + 30.0 * smooth)
    hops = voltage_ratio(bounces())
    chatter = np.convolve(grains(500, 2.6), np.hanning(10))[:N]
    tearing = grains(9000, 0.57) * (3.5 + np.exp(-phase / 0.89)) * voltage_ratio(1.2 * walk(140))
    chips = unit(colour(tearing, [(300, -58.5)] + CHIPS))
    vise = vise_ring(pulses, chatter, vise_gain * stall * calm * hops)
    metal = saw_frame(chips, chatter, rasp_db) + loosening_offcut(rasp_db)
    rasp = chip_rasp(chips, rasp_db)
    bench_db = curves(LOAD)[0] + GLIDE_DB * fast
    bench = unit(resonate(thumps(300, 3.2), BENCH)) * voltage_ratio(bench_db + 5.5) * calm ** 1.1
    judder = hops * voltage_ratio(3.1 * calm * np.tanh(walk(75)))
    return pan(vise, 5.24) + pan(metal * judder, 0.89) + pan(rasp * np.sqrt(judder), 0.55) + pan(bench, -2.5)


def clicks():
    rings = np.zeros(N)
    for s, db, hz, t60 in CLICKS:
        modes = [(hz, -2, t60), (0.97 * hz, -8, .02), (0.5 * hz, -8, .03)]
        rings = rings + ring(blows([s], [db], .0002), modes)
    nails = ring(blows(*np.transpose(TICKS), .00003), NAIL_MODES)
    return pan(rings + highpass(nails, 2, 5000), .3)


def saw_laid_down():
    s, db, metal_db, wood_db = np.transpose(KNOCKS)
    metal = blows(s, db + metal_db, .0001)
    rattle = signal.lfilter([1], [1, -np.exp(-1 / (0.027 * SR))], metal) * grains(7300, 1.6)
    rattle = colour(rattle, RATTLE)
    wood = ring(blows(s, db + wood_db, 0.00055), WOOD_MODES)
    loose = voltage_ratio(2.5 * walk(100))
    frame = np.zeros(N)
    for mode, scatter in zip(SAW_MODES + BLADE_MODES, 3.0 * rng.standard_normal((len(s), 20)).T):
        damped_db = BLADE_LATE_DB * (mode[0] > 4500) * (s > 6.55)
        frame = frame + ring(blows(s, db + metal_db + scatter + damped_db, .00006), [mode])
    return pan(voltage_ratio(-3.0) * loose * frame + voltage_ratio(-2.5) * rattle + voltage_ratio(-11.0) * wood, 1.1)


def handling():
    low, board, gritty = np.zeros((3, N))
    for s, stop, db, board_db, grit_db in HANDLING:
        shape = swell(s - SLIDE_RISE_S, s, stop, SLIDE_FADE_DB, 2.3, 1) * voltage_ratio(db)
        low = low + shape
        board = board + shape * voltage_ratio(board_db)
        gritty = gritty + shape * voltage_ratio(grit_db)
    grit = np.convolve(grains(5000, 1.2), np.hanning(8))[:N]
    slips = np.convolve(grains(1200, 5.0), np.hanning(24))[:N]
    out = unit(resonate(thumps(220, 2.6), BENCH)) * low * voltage_ratio(-4.5)
    out = out + unit(ring(slips, WOOD_MODES[2:-1])) * board * voltage_ratio(-4.5)
    out = out + unit(resonate(grit, [(1900, 3700, 0.26), (3420, 1700, -2.2)])) * gritty * voltage_ratio(-9.0)
    return pan(out, 0.58)


def brass_piece():
    s, db = np.transpose(DROPS)
    hit = blows(s, db, .00003)
    fizz = signal.lfilter([1], [1, -np.exp(-1 / (.025 * SR))], hit) * rng.standard_normal(N)
    fizz = colour(fizz, FIZZ)
    thud = ring(blows(s[:2], [-20, -26], 0.00088), THUD_MODES)
    tipped = ring(blows(*np.transpose(REBOUNDS), .00015), TIPPED_MODES)
    sing = ring(hit, BRASS_MODES) + resonate(tipped, [(5080, 350, 0), (8120, 300, 0)])
    waver = voltage_ratio(3.5 * walk(120))
    sing = highpass(sing * waver, 8, 4200)
    return pan(voltage_ratio(1.5) * sing + voltage_ratio(-15.5) * fizz, 2.0) + pan(thud, 0.24)


def room(x):
    lag = np.arange(int(.5 * SR)) / SR
    tails = rng.standard_normal((2, len(lag))) * np.exp(-np.log(1000) * lag / ROOM_T60_S) * (lag > .003)
    tails /= np.sqrt(np.sum(tails ** 2, axis=1, keepdims=True))
    both, unlike = signal.fftconvolve(x.mean(0)[None], tails, axes=1)[:, :N]
    both = colour(both, TAIL)
    unlike = colour(unlike, WIDTH)* voltage_ratio(1.0)
    return np.array([both + unlike, both - unlike])


def scene():
    hits = clicks() + saw_laid_down() + handling() + brass_piece()
    near = colour(saw(), BASS_CUT) + highpass(hits, 4, 100)
    return near + room(near) + background()


def top_cut(x):
    return signal.sosfilt(signal.butter(12, 15770, fs=SR, output="sos"), x)


def record(dry):
    x = dry / (1 + np.abs(dry / .94) ** 8) ** (1 / 8)
    x = signal.sosfilt(signal.ellip(10, .2, 60, 15750, fs=SR, output="sos"), x)
    return top_cut(x)


dry = scene()
out = record(dry)
inscribe(out)
```